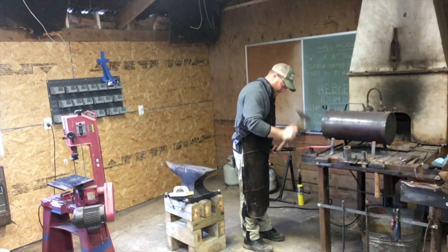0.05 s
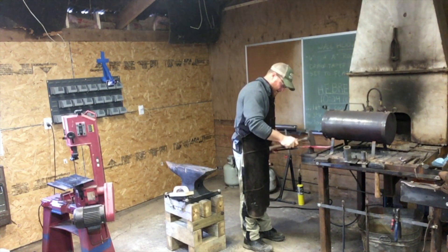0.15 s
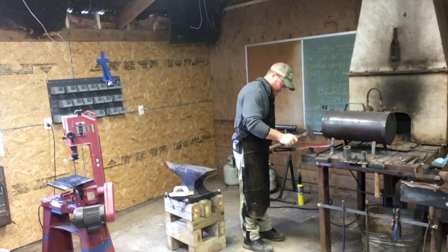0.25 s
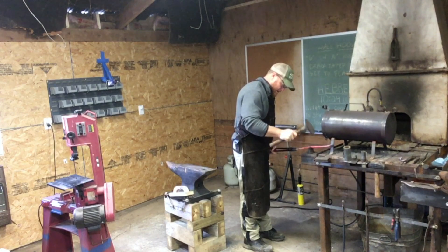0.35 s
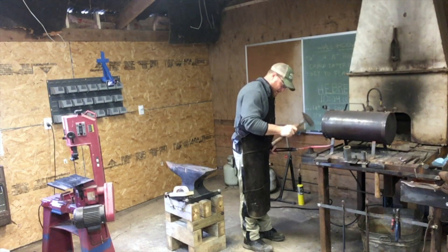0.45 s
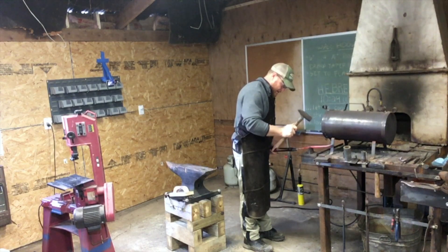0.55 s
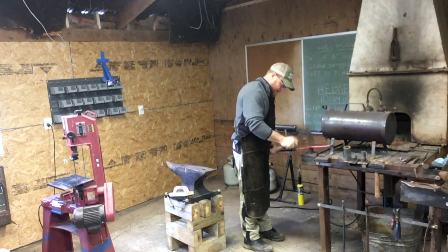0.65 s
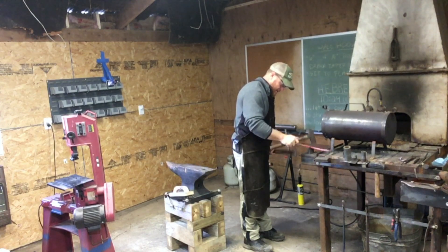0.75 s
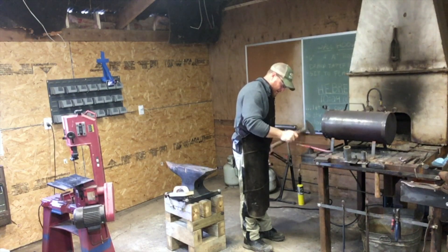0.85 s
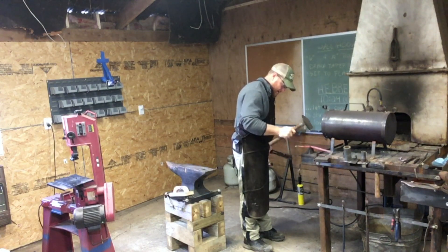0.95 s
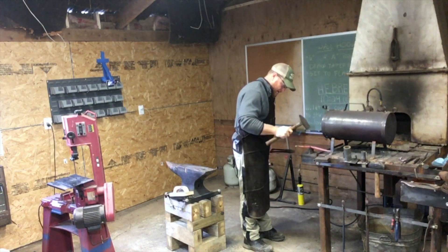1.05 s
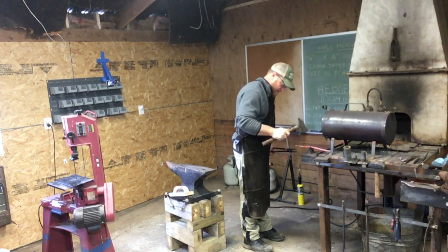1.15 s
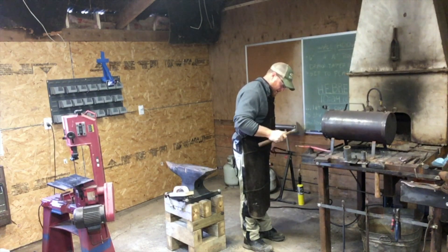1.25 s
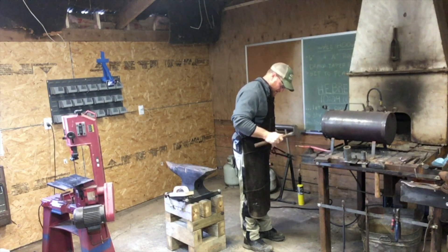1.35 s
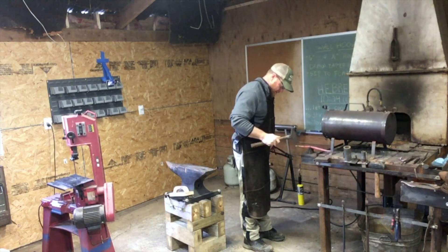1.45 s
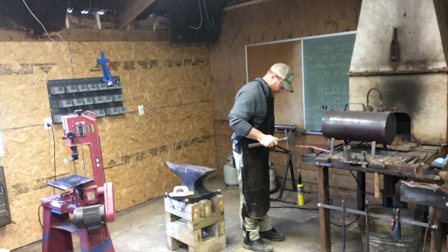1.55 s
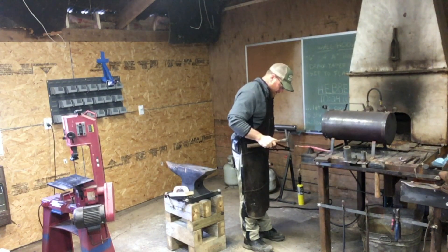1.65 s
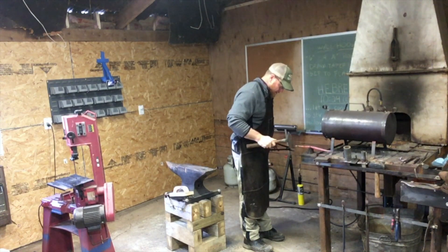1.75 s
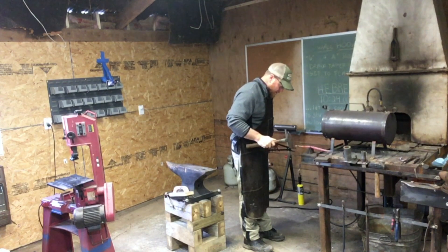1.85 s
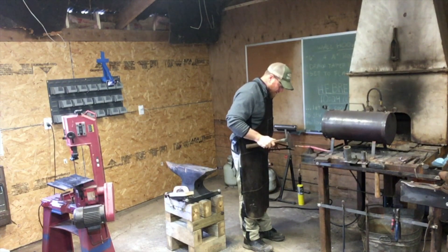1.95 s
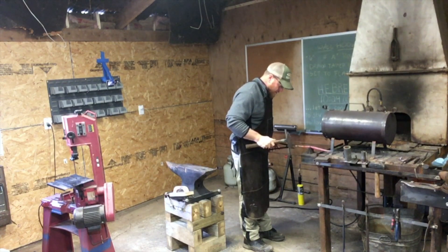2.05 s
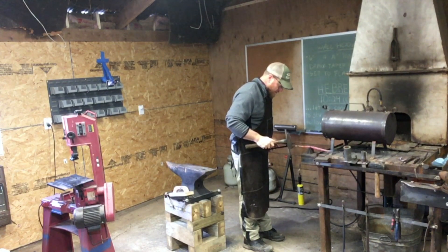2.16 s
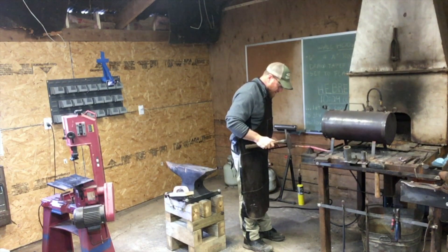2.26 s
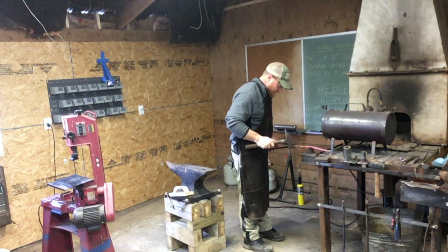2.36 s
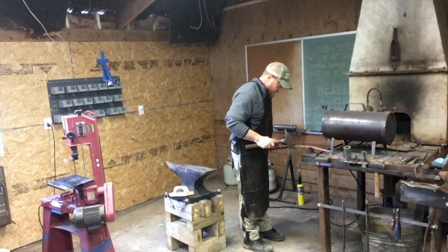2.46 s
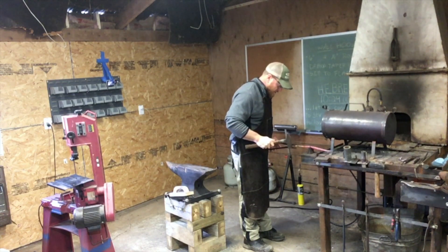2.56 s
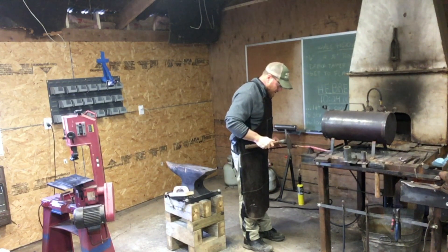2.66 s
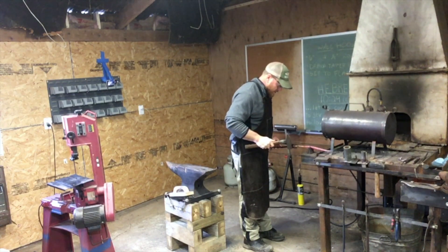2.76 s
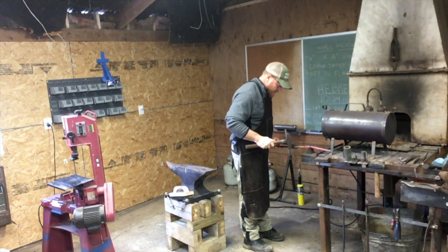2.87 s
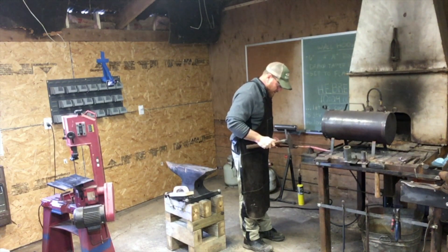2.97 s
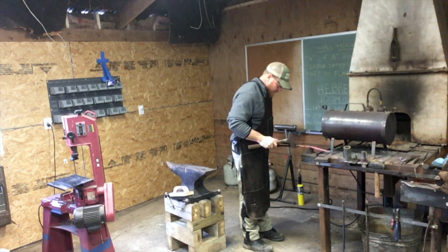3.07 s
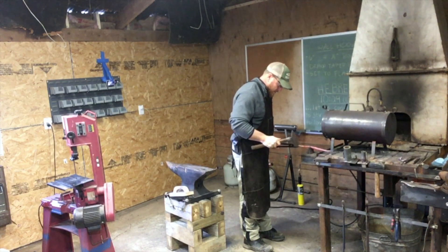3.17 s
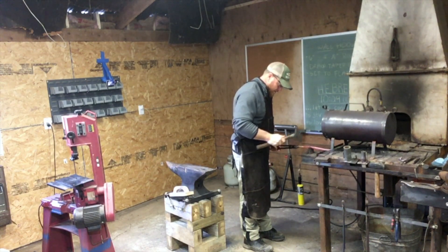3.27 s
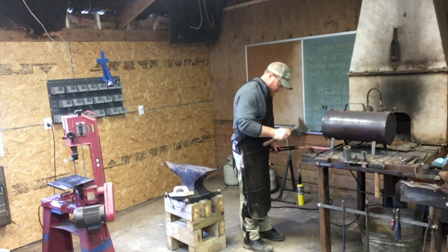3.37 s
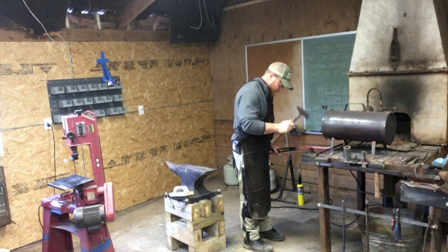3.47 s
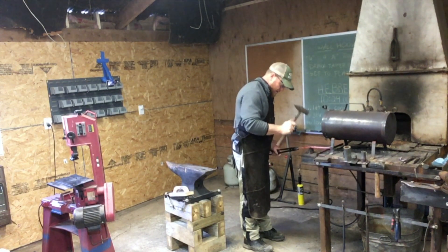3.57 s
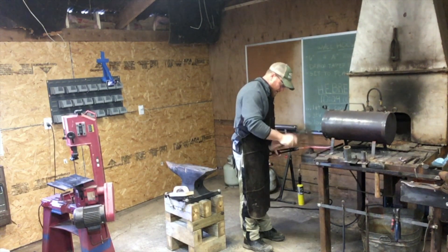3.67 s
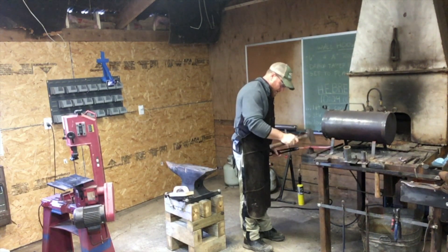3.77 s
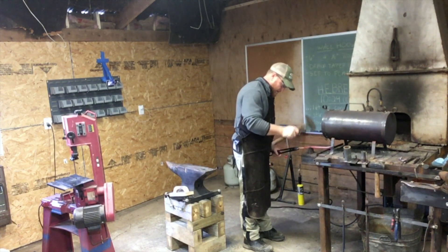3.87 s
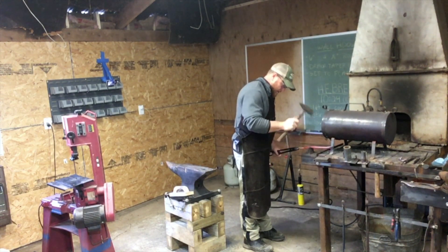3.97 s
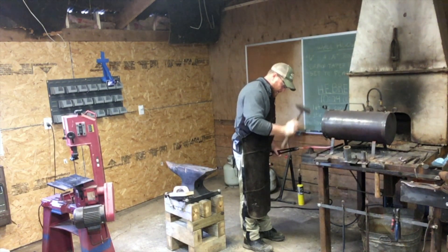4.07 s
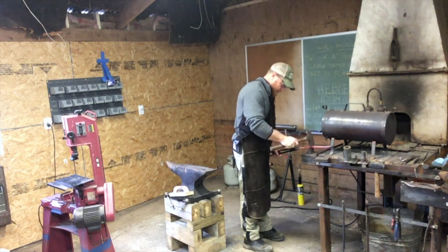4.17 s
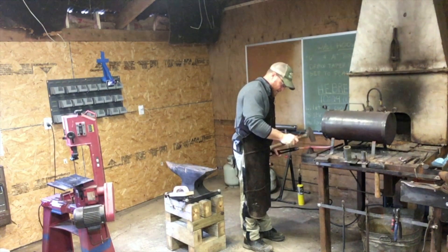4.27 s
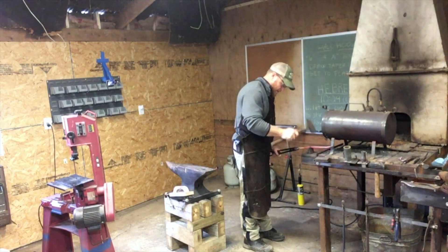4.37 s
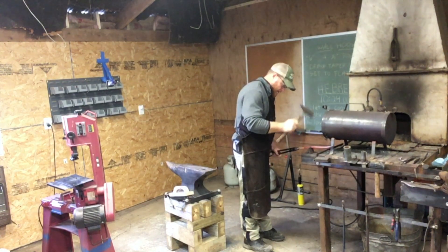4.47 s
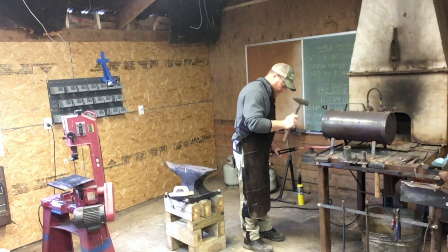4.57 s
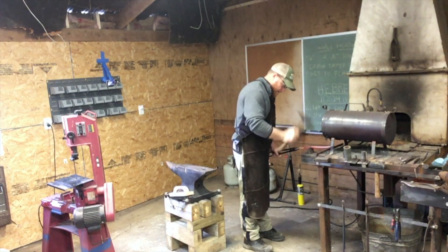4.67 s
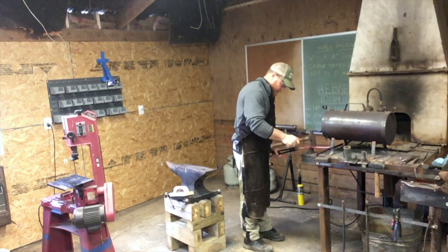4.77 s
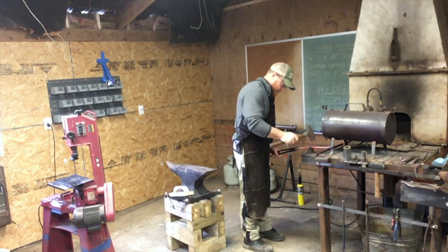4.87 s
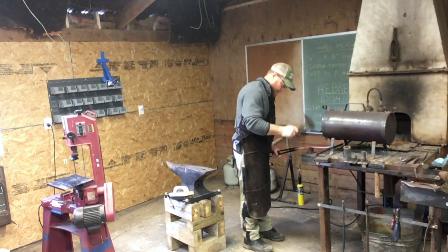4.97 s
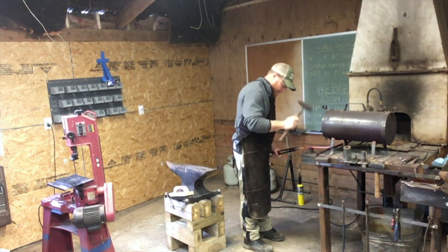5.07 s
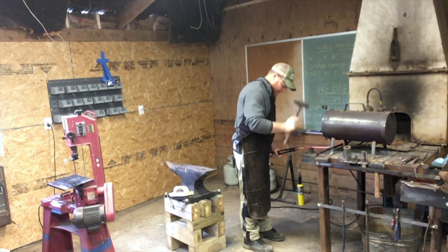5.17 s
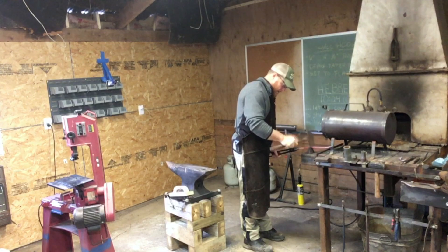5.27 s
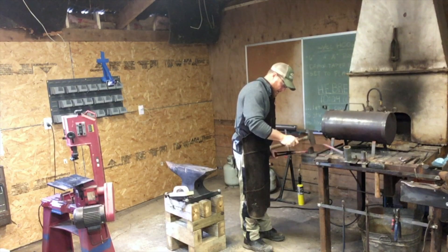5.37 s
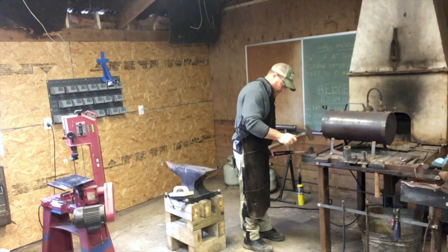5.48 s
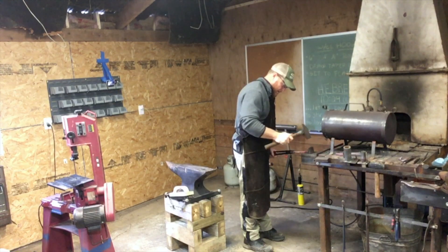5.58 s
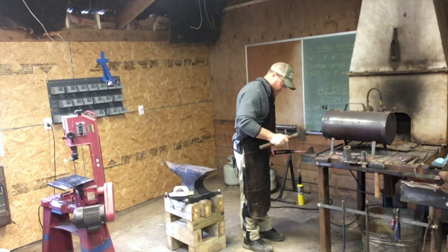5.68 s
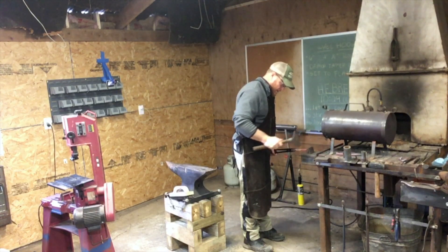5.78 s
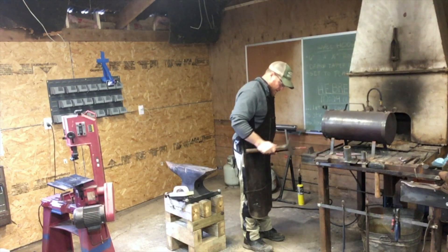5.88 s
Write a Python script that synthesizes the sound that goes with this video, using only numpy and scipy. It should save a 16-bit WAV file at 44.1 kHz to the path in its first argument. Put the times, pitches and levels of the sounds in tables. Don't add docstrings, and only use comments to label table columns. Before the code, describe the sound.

A hammer clangs on steel over a bench, heard from across a boxy workshop. Two blows about half a second apart, then three seconds of quiet forge hum and airy noise, broken by a light clink and brief scrape. Four evenly spaced blows close the scene, rising to a piercing one. Soft gated onsets, compressed peaks and noise suppression between blows.

```python
import sys
import numpy as np
from scipy import signal
from scipy.fft import rfft, irfft, next_fast_len
from scipy.io import wavfile
from scipy.ndimage import uniform_filter1d, map_coordinates

SR = 44100
rng = np.random.default_rng(int(sys.argv[2]) if len(sys.argv) > 2 else 0)


def field_ratio(decibels):
    return 10 ** (np.asarray(decibels, dtype=float) / 20)


def waveform_to_disk(signal):
    frames = np.transpose(np.atleast_2d(signal))
    scaled = np.clip(frames, -1, 1) * 32767
    samples = np.round(scaled).astype(np.int16)
    wavfile.write(sys.argv[1], SR, samples)


N = 261513

# pitch_hz, level_db
FLAME_SPECTRUM = [(24, -75.5), (40, -45), (70, -47.5), (113, -26.5), (145, -8), (176, -2.5), (220, -4.5),
                  (253, -22), (300, -18.5), (390, -43.5), (660, -120)]
# start_s, peak_db, pitch_hz
FLAME_POPS = [(1.543, -40.5, 190), (1.607, -41.5, 193), (1.665, -43.5, 205), (1.975, -39.5, 202),
              (2.665, -46, 180), (3.29, -43, 181), (3.33, -37.5, 181), (3.407, -49, 222)]
# pitch_hz, level_db
AIR_SPECTRUM = [(150, -32), (260, -8), (336, -6), (593, -7), (646, -10.5), (943, -11), (1060, -17.5),
                (1580, -23.5), (2650, -29.5), (4900, -29), (5400, -35), (14300, -39.5), (15800, -44)]
# centre_hz, width_hz, level_db (not used)
AIR_BANDS = [(1490, 120, 0), (2200, 60, -6), (2950, 63, -8), (3540, 94, -7), (6050, 65, -16),
             (7610, 92, -15), (8410, 150, -17)]
# start_s, length_s, level_db
SCALE_FIZZ = [
    (3.98, 0.27, -65.5),
    (4.423, 0.46, -80.5),
    (5.73, 0.21, -60.5),
]
# start_s, peak_db
TONG_CONTACTS = [
    (2.6914, -65),
    (2.809, -42.5),
]
# pitch_hz, level_db, t60_s
TONG_MODES = [(3070, -7, 0.079), (4370, -3, 0.1), (4450, 4, 0.039), (4850, -23, .07), (6700, -10, .03),
              (7200, -12, 0.1)]
# start_s, level_db, length_s
BAR_STROKES = [
    (3.09, -69, 0.043),
    (3.162, -50.5, 0.047),
]
# centre_hz, width_hz, level_db
BAR_RESONANCES = [(680, 410, -1), (1470, 170, 3.5), (2200, 250, -29)]
# start_s, strength_db, brightness_db_per_octave, decay_stretch (ratio), gate_opening_s
BLOWS = [
    (-.4, -8.5, 1, 1.056, .035),
    (.151, -7.5, 0.95, 0.94, 0.046),
    (.699, -7, 0.3, 0.89, 0.061),
    (3.742, -9, 0.49, 0.98, 0.051),
    (4.218, -7, 0.24, 0.92, 0.073),
    (4.768, -5, 1.01, 0.89, 0.074),
    (5.335, -4.5, 3.5, 1.038, 0.099),
    (5.471, -26, -2.5, 0.75, 0.0055),
]
# bending_db, upper_bending_over_mean_db, twisting_db, lengthwise_db
HEAD_MOTIONS = [(-41.5, 1, -39.5, -78.5), (-33, -2.5, -24, -70), (-31, 7.5, -33.5, -45.5),
                (-30, 3.5, -28.5, -45), (-34.5, -8.5, -44.5, -76), (-34.5, -1.5, -34, -57.5),
                (-13.5, -3, -31, -30), (-38.5, -4.5, -29.5, -66)]
# pitch_hz, t60_s, unsteadiness (about 0-1)
HEAD_MODES = [(3383, 0.43, 0.99), (3424, 0.43, 1.2), (4103, .3, .4), (4645, .36, 1.28), (8325, 1.046, 0.1),
              (10790, 0.19, .8), (14990, 1.1, .3)]
# pitch_hz, level_db, t60_s
BENCH_MODES = [(341, -31.5, 0.96), (438, -34.5, .6), (513, -35, 0.86), (530, -28, 0.98), (716, -31.5, 0.45),
               (863, -27.5, .6), (1013, -25.5, 0.64), (1090, -29.5, 0.41), (1139, -24, 0.65),
               (1168, -31, 0.65), (1228, -32.5, 0.62), (1392, -30, 0.49), (1566, -30.5, .36),
               (1629, -25, 0.61), (1826, -27, 0.33), (2626, -25.5, 0.19), (2800, -34.5, 0.23),
               (5690, -38, .25)]
# pitch_hz, level_db_per_hz
IMPACT_SPECTRUM = [(18, -67.5), (30, -39), (108, -29.5), (183, -7), (251, -14.5), (350, -5.5), (523, -3),
                   (931, -7.5), (1120, -4.5), (1270, -6.5), (1660, -7), (2210, -7), (4730, -10.5),
                   (5540, -17), (15000, -25), (15500, -32.5)]
# pitch_hz, build_up_s, early_t60_s, late_t60_s, late_level_db
SHOP_REVERB = [(60, 0.038, 0.23, 0.45, -21.5), (166, 0.038, 0.62, 1.6, -14), (280, 0.012, 0.63, 1.2, -6.5),
               (439, 0.012, .45, 1.11, -8.5), (1000, 0.022, .4, 0.88, -11), (1600, 0.025, .33, 0.78, -11.5),
               (2500, 0.022, 0.27, 0.66, -12.5), (4700, 0.011, 0.3, 0.55, -9.5),
               (9000, 0.008, 0.1342, 0.38, -7), (12210, 0.0087, 0.18, 0.29, -10.5),
               (15310, .008, .1, .28, -12)]
# pitch_hz, level_db (per band)
SUPPRESSOR_KNEE = [(150, -78), (500, -65), (1200, -59.5), (3500, -63), (8000, -66.5), (15000, -75)]
# start_s, end_s, above_hz
THIN_TREBLE = [
    (3.857, 3.99, 7760),
    (5.5, 5.57, 11700),
    (5.55, 5.72, 6660),
]


def unit(x):
    return x / np.sqrt(np.mean(x ** 2) + 1e-20)


def along(points, hz):
    f, *columns = np.transpose(points)
    return [np.interp(np.log(hz + 1), np.log(f + 1), column) for column in columns]


def noise(response, count):
    m = next_fast_len(count)
    spectrum = rfft(rng.standard_normal(m)) * response(np.fft.rfftfreq(m, 1 / SR))
    return unit(irfft(spectrum, m)[:count])


def filtered(x, response):
    return irfft(rfft(x) * response(np.fft.rfftfreq(N, 1 / SR)), N)


def wobble(rate, count):
    knots = rng.standard_normal(count // 100)
    return map_coordinates(knots, [np.arange(count) * rate / SR])


def add(track, s, sound):
    i = round(s * SR)
    sound = sound[max(-i, 0):N - i]
    track[max(i, 0):][:len(sound)] += sound


def since(times):
    now, times = np.arange(N) / SR, np.append(-N / SR, times)
    return now - times[np.searchsorted(times, now, side="right") - 1]


def swell(t, peak_s):
    return t / peak_s * np.exp(1 - t / peak_s)


def ringing(modes, t, scatter_db, beat_db, smear):
    out = np.zeros(len(t))
    for hz, db, t60, rough in modes:
        beating = rough * beat_db * np.tanh(wobble(15 + 20 * rough, len(t)))
        level_db = db + scatter_db * rng.normal() + beating - 60 * t / t60
        blur = rough * smear * wobble(15 + 25 * rough, len(t))
        out += field_ratio(level_db) * np.sin(2 * np.pi * (hz * t + rng.random() + blur))
    return out


def suppressed(x, bite):
    hz, _, z = signal.stft(x, SR, nperseg=512)
    power = uniform_filter1d(np.abs(z) ** 2, size=3, axis=0)
    power = uniform_filter1d(power, size=5, axis=1)
    under = field_ratio(along(SUPPRESSOR_KNEE, hz)[0])[:, None] ** 2 / (np.abs(power) + 1e-20)
    return signal.istft(z * (1 + under) ** (-bite / 2), SR, nperseg=512)[1][:len(x)]


def shop_air(f):
    bands = sum(np.exp(-((f - hz) / (width + 80)) ** 2) for hz, width, _ in AIR_BANDS)
    return field_ratio(along(AIR_SPECTRUM, f)[0] + 4.5 * bands - 3 * f / 10000)


def forge():
    after = since([blow[0] for blow in BLOWS[:-1]])
    opened = 1 / (1 + (after / 0.85) ** 4)
    boom_db = 8.5 * swell(after, 0.07)
    nudge_db = 6 * swell(since([BAR_STROKES[-1][0]]), 0.084)
    flame_db = -61 + 4.5 * opened + boom_db
    air_db = -69.5 + 11 * opened + nudge_db
    lumps = field_ratio(2 * wobble(35, N))
    flame = lumps * noise(lambda f: field_ratio(along(FLAME_SPECTRUM, f)[0]), N)
    out = field_ratio(flame_db + 2.5) * unit(flame)
    out = out + field_ratio(air_db + 1.8 * wobble(3, N)) * noise(shop_air, N)
    t = np.arange(SR // 10) / SR
    for s, db, hz in FLAME_POPS:
        puff = np.exp(-((t - 0.014) / 0.0083) ** 2)
        add(out, s - 0.006, field_ratio(db - 3.0) * puff * np.sin(2 * np.pi * hz * t))
    return out


def sizzle():
    out = np.zeros(N)
    for s, length, db in SCALE_FIZZ:
        count = int(length * SR)
        for centre_hz, width_hz in [(7500, 1300), (10000, 680), (12600, 1500)]:
            band = lambda f: np.exp(-((f - centre_hz) / width_hz) ** 4)
            patches = field_ratio(db - 14.0 + 6.7 * wobble(15, SR)[:count])
            add(out, s, patches * np.hanning(count) ** 0.37 * noise(band, SR)[:count])
    return out


def tongs():
    out, t = np.zeros(N), np.arange(SR // 2) / SR
    contact = lambda f: np.exp(-np.log((f + 1) / 4300) ** 2 / 0.33)
    for s, db in TONG_CONTACTS:
        ring = ringing([(*mode, 3) for mode in TONG_MODES], t, scatter_db=2.0, beat_db=1.5, smear=0.086)
        crack = 0.23 * field_ratio(-60 * t / 0.025) * noise(contact, len(t))
        add(out, s, field_ratio(db - 4.5) * (ring + crack) * (1 - np.exp(-t / 0.00053)))
    return out


def dragged_bar():
    out, t = np.zeros(N), np.arange(SR // 2) / SR

    def body(f):
        resonances = sum(field_ratio(db) * f * w / (c * c - f * f + 1j * f * w) for c, w, db in BAR_RESONANCES)
        return resonances / (1 + (f / 2300) ** 12)

    for s, db, length in BAR_STROKES:
        decay_db = -60 * np.clip(t - length, 0, None) / 0.18
        stroke = (1 - np.exp(-t / 0.0045)) * field_ratio(decay_db + 1.0 * wobble(65, len(t)))
        add(out, s, field_ratio(db) * stroke * noise(body, len(t)))
    return out


def crash(brightness, stretch, t, ripple):
    def colour(f):
        tilt_db = brightness * np.log2((f + 1) / 1500)
        return field_ratio(along(IMPACT_SPECTRUM, f)[0] + tilt_db + np.interp(f, np.arange(SR), ripple))

    hz, u, z = signal.stft(noise(colour, len(t)), SR, nperseg=256)
    build, early, late, late_db = (column[:, None] for column in along(SHOP_REVERB, hz))
    decay = field_ratio(-60 * u / (early * stretch)) + field_ratio(late_db - 60 * u / (late * stretch))
    return signal.istft(z * (1 - np.exp(-u / build)) ** 2 * decay, SR, nperseg=256)[1][:len(t)]


def bench_ring(t):
    ring = ringing([(*mode, 1) for mode in BENCH_MODES], t, scatter_db=3.5, beat_db=1.0, smear=0.09)
    return ring * (1 - np.exp(-t / 0.028))


def head_levels(bend_db, lean_db, twist_db, length_db):
    edge_db = -28 + 0.49 * bend_db
    shrill_db = 24.5 + 2.4 * length_db
    return (bend_db - lean_db - 1.5, bend_db - lean_db - 8.5, twist_db, bend_db + lean_db,
            length_db, edge_db, shrill_db)


def head_ring(motions, t):
    modes = [(hz, db, *rest) for (hz, *rest), db in zip(HEAD_MODES, head_levels(*motions))]
    ring = ringing(modes, t, scatter_db=2.5, beat_db=4.0, smear=0.16)
    swing = 1 + 0.34 * np.cos(2 * np.pi * 3.8 * (t - 0.27))
    return ring * (1 - np.exp(-t / 0.0075)) * swing


def hammer():
    out, t = np.zeros(N), np.arange(2 * SR) / SR
    ripple = 2.9 * wobble(1200, 10 * SR)[:SR]
    riding = field_ratio(-6.5 * np.exp(-t / 0.017))
    for (s, db, brightness, stretch, opening), motions in zip(BLOWS, HEAD_MOTIONS):
        blow = field_ratio(db + 5.5) * crash(brightness, stretch, t, ripple)
        blow = blow + field_ratio(db + 15.0 - 0.6 * brightness) * bench_ring(t)
        blow = blow + field_ratio(12) * head_ring(motions, t)
        gate = np.sin(np.pi / 2 * np.clip(t / opening, 0, 1)) ** 1.12
        add(out, s, gate * riding * blow)
    return suppressed(out, bite=1.4)


def scene():
    struck = filtered(hammer(), lambda f: 1 / np.sqrt(1 + (125 / (f + 1)) ** 8))
    return (forge() + sizzle() + tongs() + dragged_bar() + struck)[None]


def thinned_treble(x, stand_out_db=8):
    hz, t, z = signal.stft(x, SR, nperseg=1024)
    near = uniform_filter1d(np.abs(z), size=3, axis=0)
    around = uniform_filter1d(np.abs(z), size=31, axis=0)
    line = near > field_ratio(stand_out_db) * around
    ragged = uniform_filter1d(rng.standard_normal(len(hz)), size=7)[:, None]
    ragged = 0.017 * ragged * np.sqrt(7)
    thin = np.zeros(z.shape, bool)
    for start, end, above_hz in THIN_TREBLE:
        thin |= (hz[:, None] > above_hz) & (t > start + ragged) & (t < end)
    return signal.istft(z * (line | ~thin), SR, nperseg=1024)[1][:N]


def top_cut(x):
    return signal.sosfilt(signal.butter(12, 16120, fs=SR, output="sos"), x)


def record(dry):
    squashed = dry[0] / (1 + np.abs(dry[0] / 0.65) ** 3) ** (1 / 3)

    def band(f):
        bass = field_ratio(-13.5) + 1 / np.sqrt(1 + (90 / (f + 1)) ** 6)
        top = np.sqrt(1 + (f / 15330) ** 260)
        return bass / top / (1 + field_ratio(-14.0))

    mix = thinned_treble(filtered(squashed, band))[None]
    return top_cut(mix)


dry = scene()
out = record(dry)
waveform_to_disk(out)
```